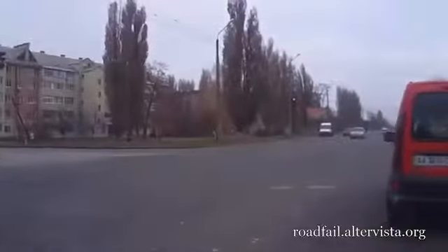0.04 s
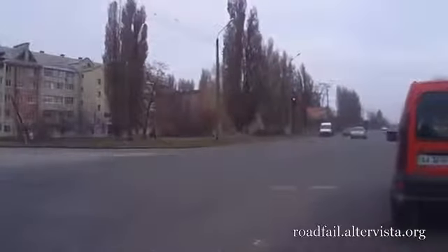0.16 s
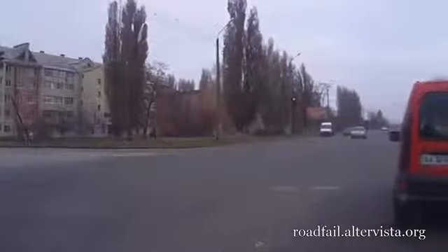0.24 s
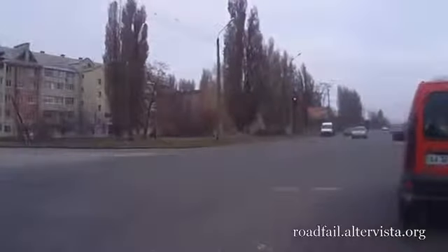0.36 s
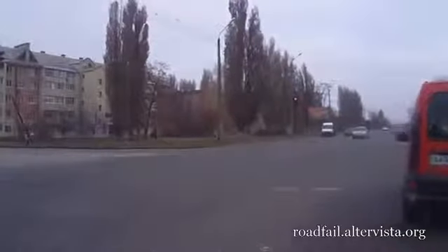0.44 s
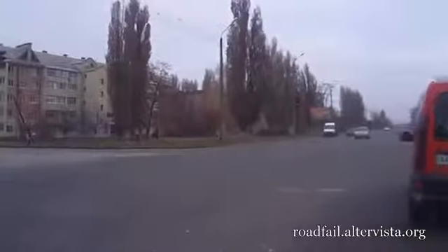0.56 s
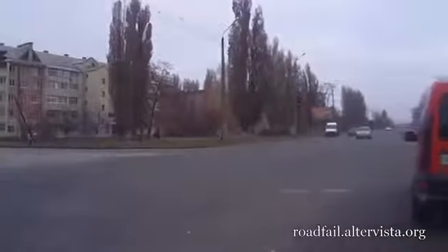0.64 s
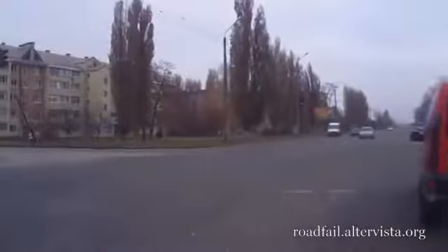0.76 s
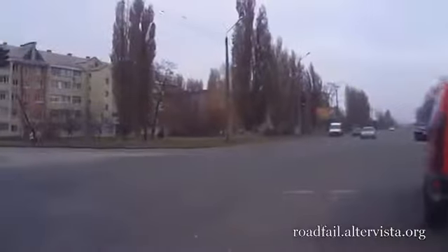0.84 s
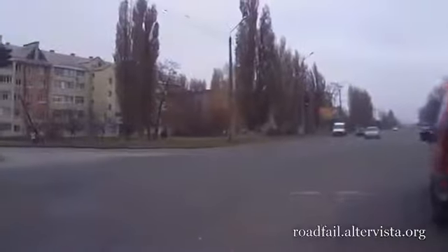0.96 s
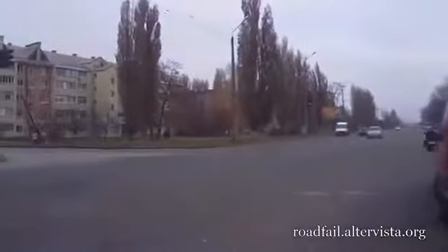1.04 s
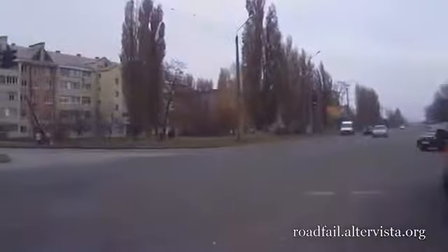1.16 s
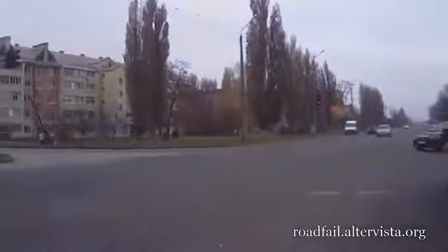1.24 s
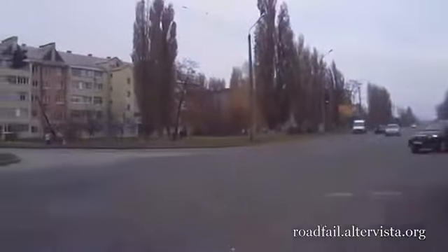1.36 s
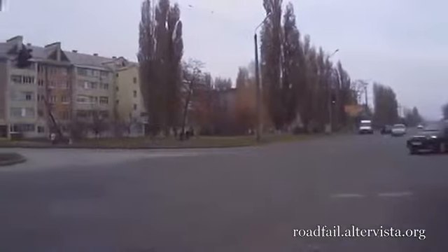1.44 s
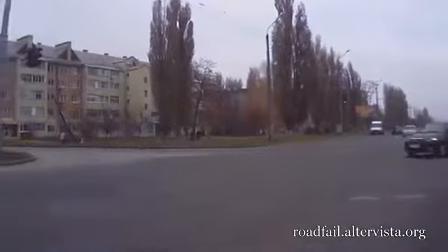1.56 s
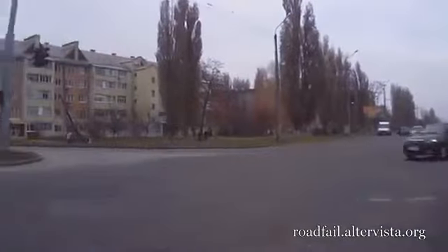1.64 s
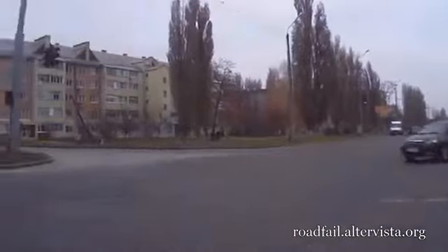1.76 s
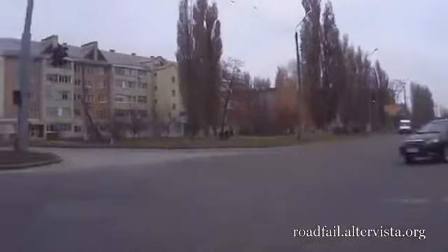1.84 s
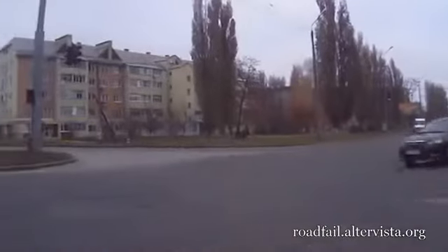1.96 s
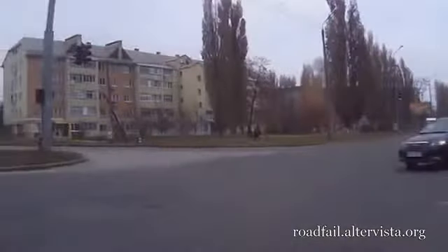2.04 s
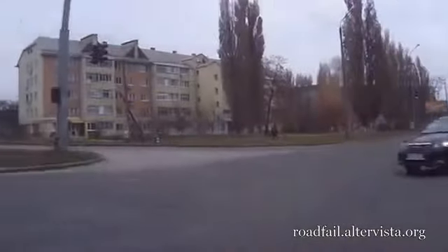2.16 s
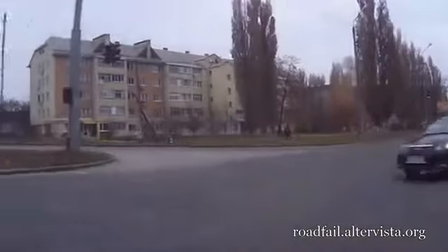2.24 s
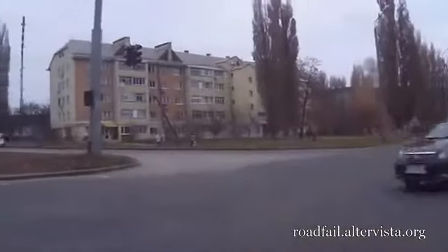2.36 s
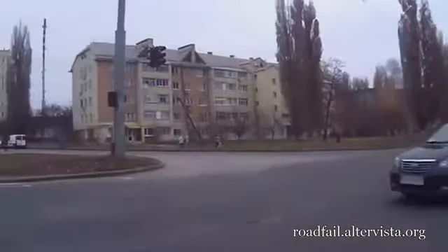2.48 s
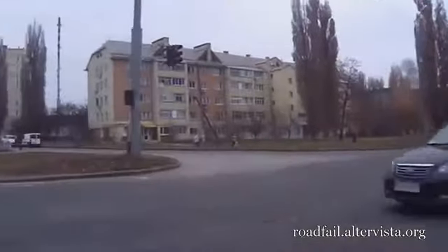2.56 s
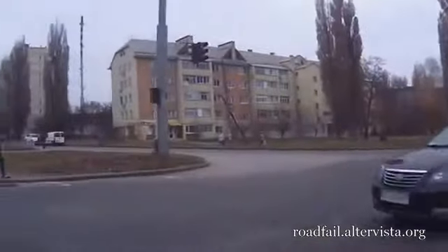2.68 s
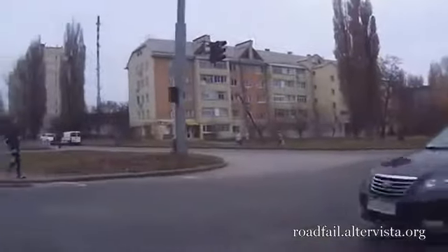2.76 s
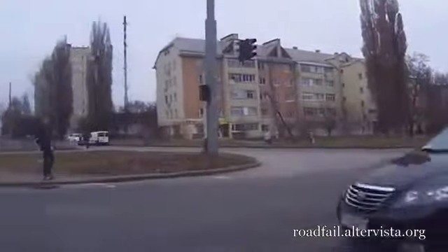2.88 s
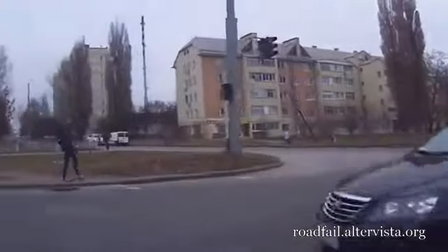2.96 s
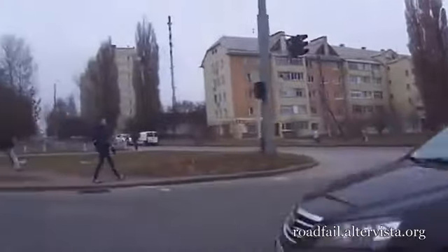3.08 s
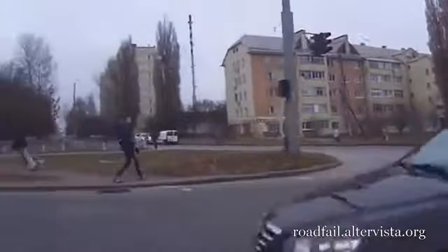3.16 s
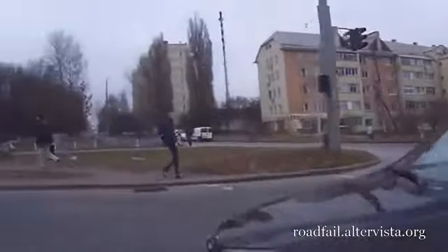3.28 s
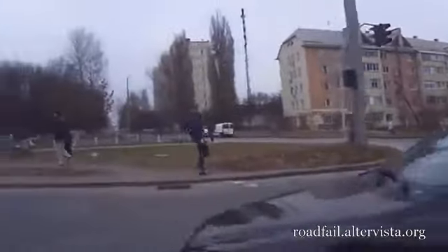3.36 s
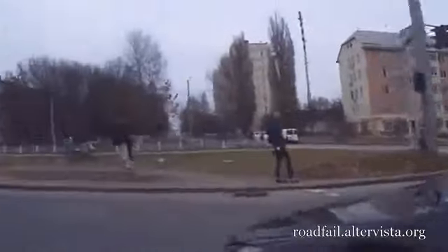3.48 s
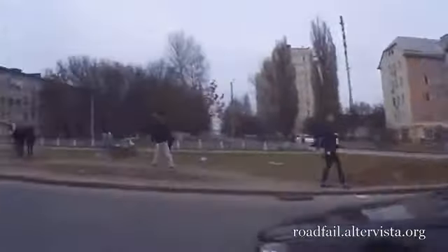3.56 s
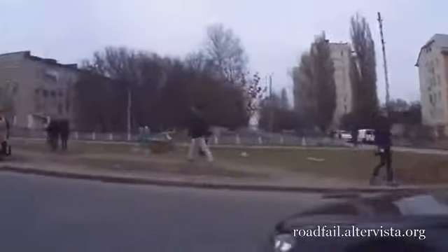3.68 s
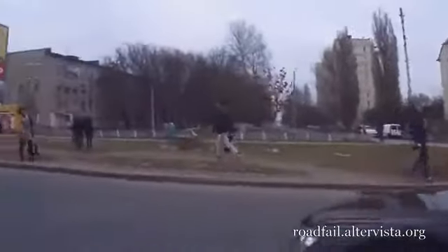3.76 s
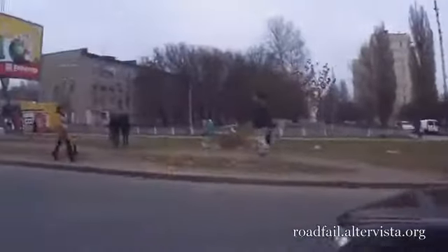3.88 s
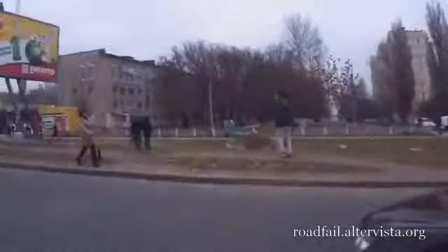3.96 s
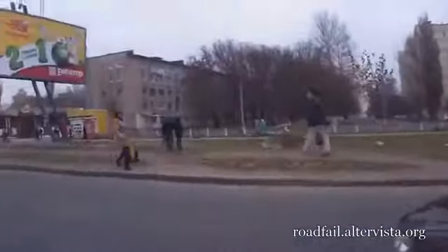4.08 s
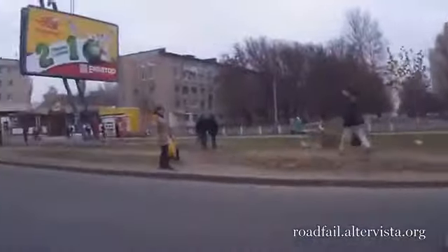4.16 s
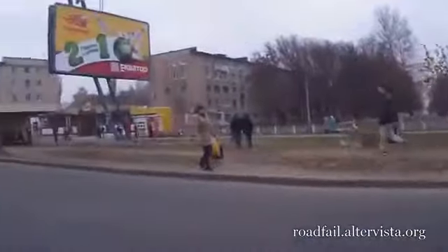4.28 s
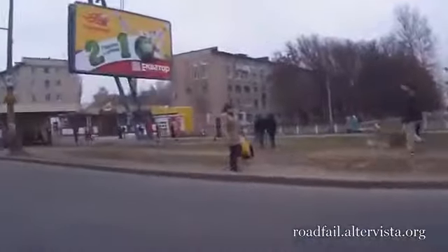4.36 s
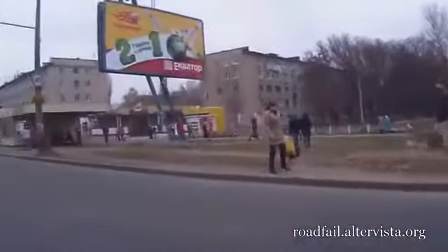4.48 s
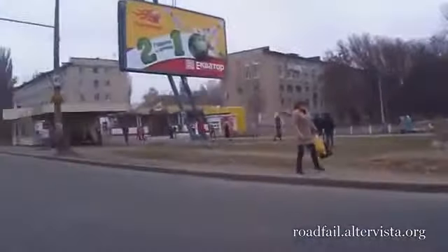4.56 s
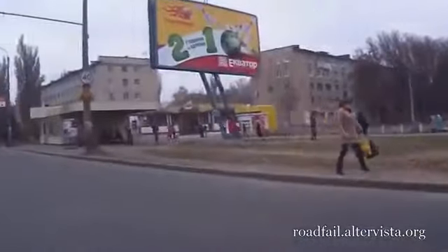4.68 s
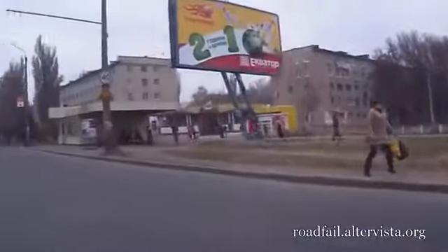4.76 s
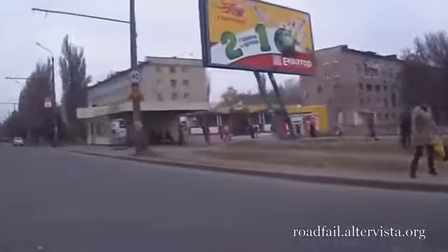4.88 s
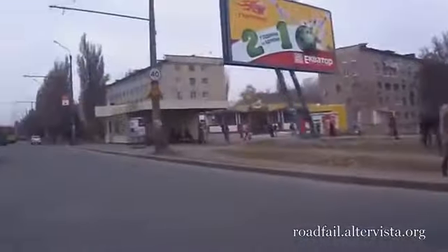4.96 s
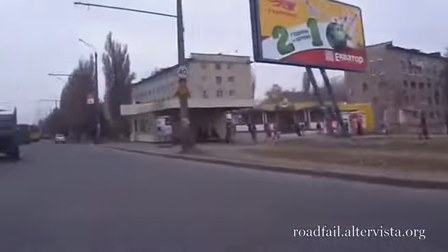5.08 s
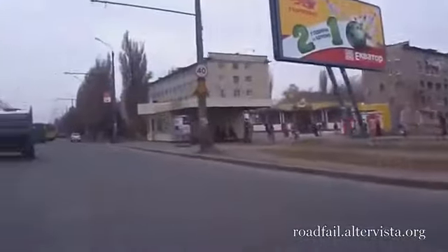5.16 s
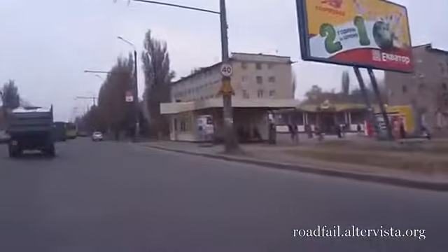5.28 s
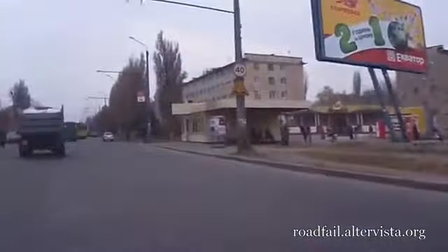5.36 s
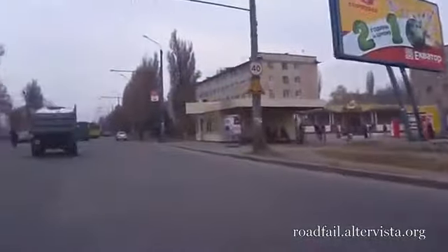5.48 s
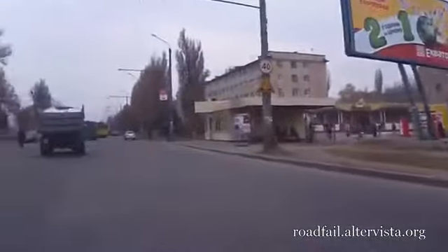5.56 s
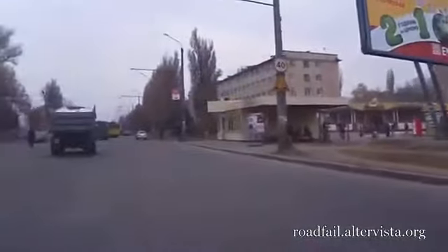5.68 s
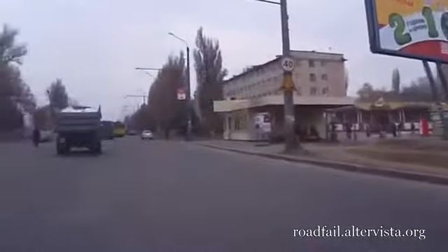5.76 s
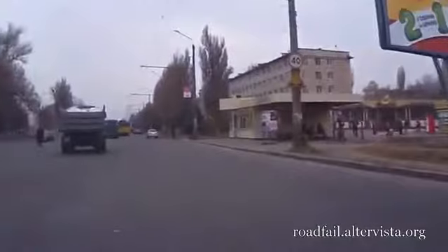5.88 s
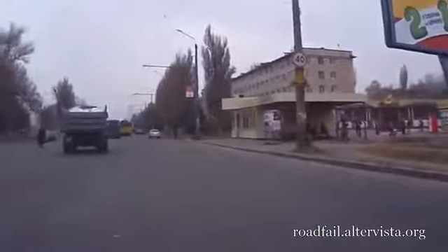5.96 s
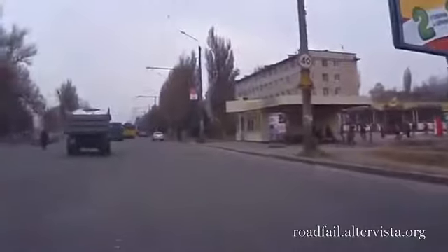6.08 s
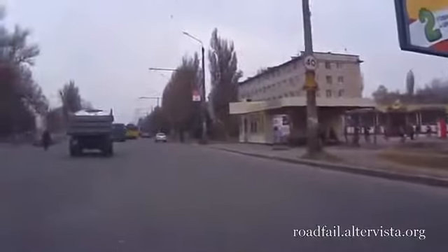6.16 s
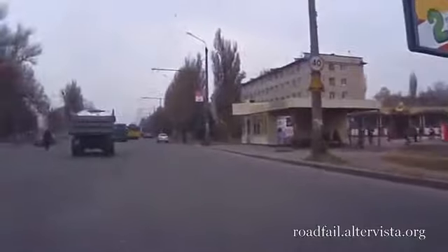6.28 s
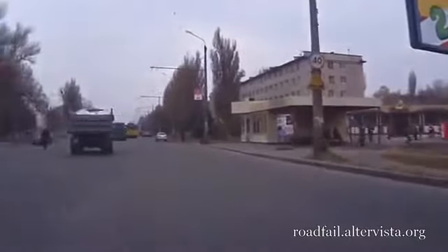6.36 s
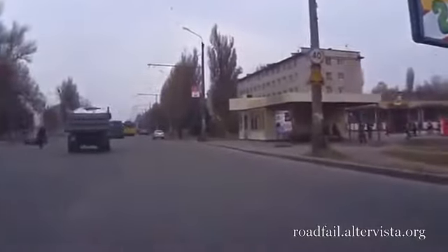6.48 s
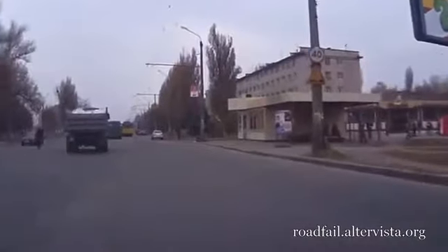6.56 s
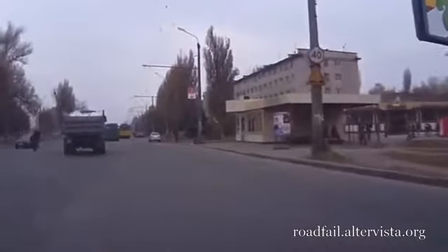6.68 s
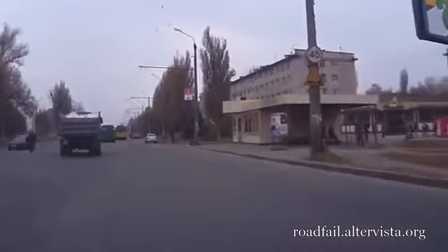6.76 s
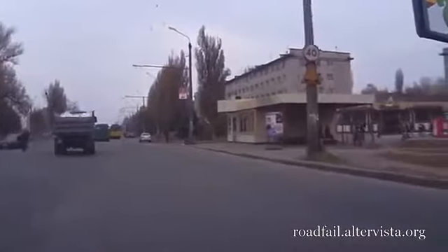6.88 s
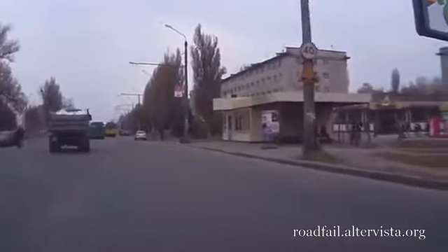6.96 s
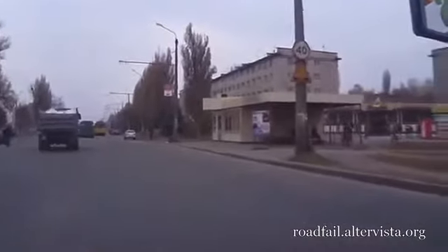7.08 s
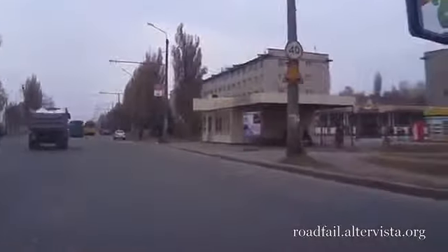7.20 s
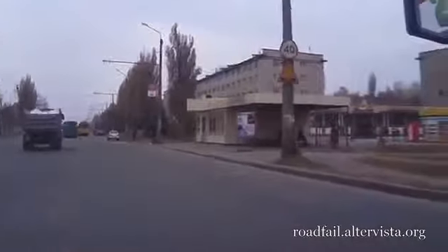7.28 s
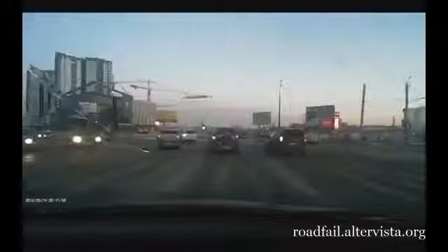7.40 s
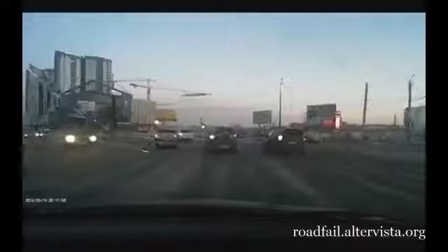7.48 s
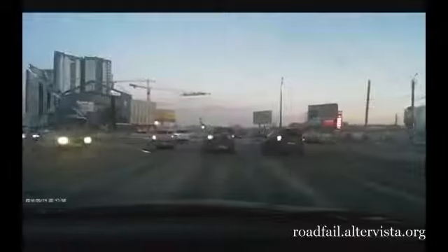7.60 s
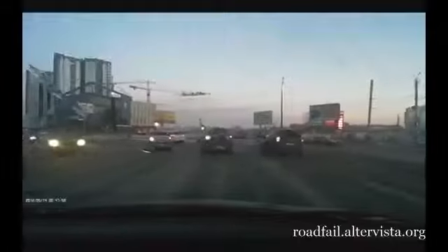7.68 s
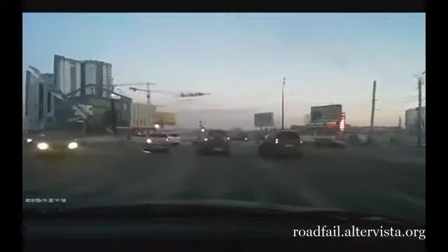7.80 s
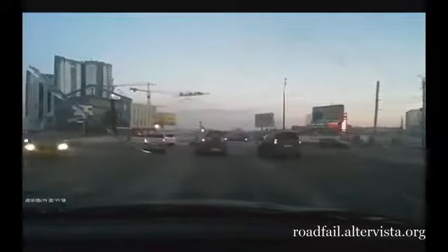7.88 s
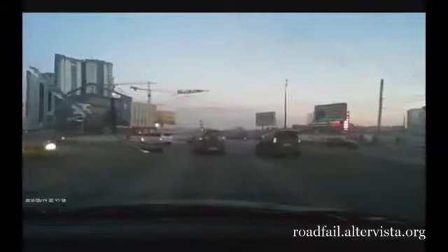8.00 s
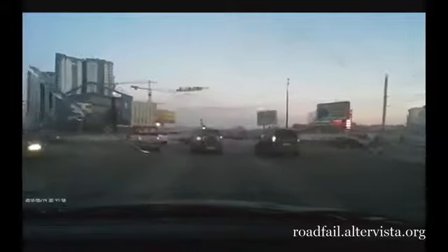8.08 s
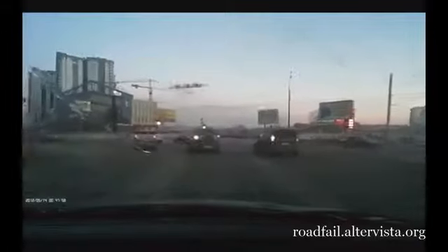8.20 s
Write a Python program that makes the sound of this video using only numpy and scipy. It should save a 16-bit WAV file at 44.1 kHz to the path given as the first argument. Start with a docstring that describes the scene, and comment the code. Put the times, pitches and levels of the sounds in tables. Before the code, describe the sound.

From inside a small car, a dashboard microphone picks up low engine hum, suspension rumble, tyre roar and faint hiss. From 0 to 0.9 seconds the engine sinks, then pulls and rises to a peak near 2.6 before easing. Hard plastic ticks, dull taps, soft rustles and tiny trim squeaks punctuate the drive. At about 3.4 a collision bursts in: deep body booms, crumpling sheet metal, dense plastic snaps and thin glass slivers, with another hard pair of cracks near 3.9. The loud blows distort and choke the microphone. The engine flares briefly around 4.05, then falls. From roughly 4 to 6.5 a bent panel rubs a tyre with hollow roaring, wavering groans, gritty scraping and tread drumming, plus a faint squeal near 4.5. A short thump lands at 4.65. Rubbing fades as the car slows, leaving low engine throb and quiet road noise. A soft knock sounds at 7.3, then an abrupt cut at 7.43.

```python
"""Car crash heard from inside

Inside a small car turning across a junction, the engine revs and eases and hard parts tick on the dashboard.
Another car hits it: shaped noise booms, random fractures ring the panels, and short bursts make plastic snap.
The loud blows overload the dashboard microphone. A bent panel then rubs on a tyre, as wandering narrow bands
and a comb of tread tones, while car and engine slow. A late soft knock follows and the sound cuts off."""
import sys
import numpy as np
from scipy import signal
from scipy.fft import rfft, irfft, next_fast_len
from scipy.io import wavfile
from scipy.ndimage import map_coordinates

SR = 44100
rng = np.random.default_rng(int(sys.argv[2]) if len(sys.argv) > 2 else 0)


def int16_out(signal):
    """Quantize to a 16-bit WAV file."""
    q = np.round(np.clip(np.atleast_2d(signal).T, -1, 1) * 32767)
    wavfile.write(sys.argv[1], SR, q.astype(np.int16))


N = 363163

# Soft rustles in the cabin: (time [s], hold [s], level [dB])
RUSTLE_EVENTS = [(0.128, 0.42, -54), (0.713, 0.067, -47.5), (1.077, 0.041, -53.5), (1.259, 0.098, -49.5),
                 (1.526, 0.079, -49.5), (2.103, 0.21, -56.5), (4.227, 0.13, -50.5), (5.179, 0.063, -46),
                 (5.389, 0.076, -50.5), (6.095, 0.81, -58.5)]
RUSTLE_ATTACK_S, RUSTLE_RELEASE_S, RUSTLE_BODY_DB = 0.094, 0.89, -8.5
HISS_DB = -59  # steady, whatever the speed

# Road speed: (time [s], tread blocks passing per second [Hz])
TREAD_RATE = [(0, 108), (.9, 98), (1.6, 117.3), (2.4, 188), (3.3, 172.9), (4.4, 159.3), (4.95, 159.1),
              (6.2, 87.99), (6.6, 76), (7.4, 68.25)]
CRUISE_HZ = 150  # tread rate at which the three road levels below hold
RUMBLE_DB, RUMBLE_DB_PER_OCTAVE = -33, 5
ROAR_DB, ROAR_DB_PER_OCTAVE = -46.5, 6
RUSH_DB, RUSH_DB_PER_OCTAVE = -55.5, 8.5
WHIR_DB = -63

# Engine speed: (time [s], firing rate [Hz])
FIRING_RATE = [(0, 71.9), (.35, 61.75), (.59, 50.3), (.9, 40.18), (1.05, 43.06), (1.25, 49.52),
               (1.45, 55.38), (1.77, 65.93), (2.18, 85.54), (2.4, 94.9), (2.57, 99.3), (2.77, 94),
               (3.08, 82.1), (3.45, 62), (4.05, 117), (4.4, 97.95), (4.88, 72.47), (5.3, 57), (6, 34.19),
               (6.4, 29.81)]
# Engine load, lifting every tone except the firing note: (time [s], lift [dB])
ENGINE_LOAD = [(0, -8), (.88, -8), (1.02, 12.5), (1.15, 12.5), (1.3, 4.5), (1.7, 3.5), (2.1, -1),
               (2.6, -2.5), (3.4, -2.5), (4.7, -1), (5.6, 14), (6.7, 12)]
# Firing note alone: (time [s], lift [dB])
FIRING_NOTE = [(0, 0.5), (.3, 4), (1.65, 1.5), (1.85, -3), (2.25, 3), (3.05, 2.5), (3.25, -6.5), (4.1, -7),
               (4.6, -0.5), (5.3, 0.5), (6, -0.5)]
# Engine tones: (multiple of the firing rate, relative level [dB])
ENGINE_ORDERS = [(.5, -10.5), (1, -0.3), (1.5, -17.5), (2, -12), (2.5, -24.5), (3, -17), (3.5, -21.5),
                 (4, -30), (5, -35), (6, -40.5), (8, -37)]
# How the body passes engine vibration: (frequency [Hz], gain [dB])
BODY_RESPONSE = [(100, -1.5), (135, 5), (160, -6), (190, -10.5), (235, -7.5), (295, 1.5), (350, 3),
                 (500, 7)]
HUNT_HZ = .5  # unsteadiness of the firing rate
# The cabin booms when the firing rate passes its lowest resonance
CABIN_BOOM_HZ, CABIN_BOOM_WIDTH_HZ, CABIN_BOOM_DB = 61.5, 4.37, 9
ENGINE_DB, ENGINE_DB_PER_OCTAVE = -36.5, 8  # level at that rate without the boom; growth with engine speed

# Cabin and windscreen resonances: (frequency [Hz], width [Hz], lift [dB])
CABIN_RESONANCES = [(248, 410, 1.5), (340, 13, 3.5), (391.5, 3.4, 7.5), (573, 6.5, 6.5), (599, 4, 8.5),
                    (673, 9.1, 11), (890, 8.3, 2.5), (996, 6.2, 9), (1630, 190, 2.5), (1840, 49, 3)]

# Hard ticks on the dashboard: (time [s], level before ringing [dB], 60 dB decay [s], ring [Hz])
TICK_EVENTS = [(0.454, -26, 0.036, 2600), (0.882, -45, .02, 10000), (1.4217, -26.5, 0.036, 9000),
               (2.2533, -23.5, 0.034, 8000), (2.589, -36, .008, 12000), (2.8595, -31, .009, 3700),
               (3.1325, -27, 0.008, 2000), (5.31, -33, 0.01, 8500), (6.375, -46, .02, 6300),
               (6.53, -48, .02, 9000)]
TICK_RING_DB, TICK_RING_Q = 5.5, 7
# Loose things tapping in the cabin: (time [s], level [dB])
TAP_EVENTS = [(.271, -45), (.455, -41), (.513, -46), (.693, -44), (1.123, -41), (1.424, -40), (1.556, -40),
              (2.129, -47), (3.133, -41), (4.338, -32), (4.892, -34)]
# Dull knocks through the body: (time [s], level [dB], pitch [Hz], 60 dB decay [s])
KNOCK_EVENTS = [(3.352, -13.5, 30.54, 0.22), (3.882, -5, 110.3, 0.11), (3.937, -5, 80, 0.14),
                (4.65, 0.5, 62.5, 0.028), (5.701, -16, 111, 0.11), (7.2988, -18.5, 256.4, 0.06),
                (7.301, -35.5, 588, 0.045)]
# Short squeaks of the trim: (centre [s], length [s], pitch [Hz], level [dB], whole bend [share of pitch])
SQUEAK_EVENTS = [(0.832, 0.058, 590, -43.5, -0.056), (1.047, 0.025, 545, -46, -.05),
                 (1.418, 0.045, 1439, -50, -.06), (1.455, .05, 1490, -53, .1),
                 (5.675, 0.012, 2420, -44.5, .02)]
SQUEAL_S, SQUEAL_HOLD_S, SQUEAL_HZ, SQUEAL_DB = 4.32, .41, 2715, -54.5

# Panel pressing harder on the tyre:
# (time [s], attack [s], hold [s], release [s], pressure [dB], extra grit [dB], groan pitch [Hz])
PRESSES = [(4.046, 0.76, 0.21, 2.2, -1, 1.5, 560), (4.384, 1, 0.17, 3.1, 0.5, 0.5, 633),
           (4.721, 0.84, 0.32, 1, -1.5, 1, 557), (5.119, 0.97, 0.16, 1.2, 0, -1, 660),
           (5.729, 0.28, 0.033, 0.57, -1, 5.5, 680), (5.823, 0.23, 0.029, 0.16, -5.5, 7, 720),
           (5.957, .3, .04, 0.48, -18, -7.5, 695), (6.182, 0.67, 0.019, 0.37, -1, 2.5, 680)]
# The panel stays against the tyre, dragging lightly between presses
DRAG_S, DRAG_HOLD_S, DRAG_DB, DRAG_HZ = 4.12, 1.89, -10, 602.5
# Tread drumming on the panel: (time [s], level [dB])
DRUM_LEVEL = [(3.9, -71), (4.1, -36), (4.45, -37), (5, -32.5), (5.2, -37), (5.42, -27.5), (5.56, -33.5),
              (5.72, -30.5), (5.87, -30), (5.97, -38), (6.15, -31.5), (6.3, -44), (6.6, -58), (6.8, -80)]
ARCH_DB, GROAN_DB, GRIT_DB = -27, -34.5, -42.5  # base levels at a pressure of 0 dB
GROAN_GROWTH, GRIT_GROWTH = 1.74, 1.6  # dB per dB of pressure
GROAN_RING_DB, GROAN_WIDTH_HZ, GROAN_WANDER = -5, 28, .035  # the panel's bending resonance
JUDDER_DB, JUDDER_PER_S = .4, 45  # the contact grabs and lets go
GROAN_CHATTER_DB, TREAD_DEPTH = .8, .4

# Slivers of glass: (time [s], hold [s], level [dB], ring [Hz])
SLIVER_EVENTS = [(3.511, .01, -28, 12020), (3.592, .015, -39, 12600), (3.657, .012, -33.5, 12200),
                 (4.074, .016, -37, 11700)]
GLASS_ATTACK_S, GLASS_RELEASE_S, GLASS_WIDTH_HZ = .03, .1, 1200

# Blows of the collision: (time [s], hold [s], body boom [dB], boom release [s], crumpling [dB])
BLOW_EVENTS = [(3.438, 0.015, -22.5, 0.28, -24), (3.454, 0.025, -8, 0.28, -15.5),
               (3.529, 0.036, -11, 0.76, -24.5), (3.647, 0.089, -20.5, 0.72, -28.5),
               (3.775, 0.0071, -19, 0.74, -26.5), (3.883, 0.016, -11, 0.21, -21),
               (3.946, 0.02, -13.5, 0.45, -24.5)]
BOOM_ATTACK_S = 0.14
CRUMPLE_ATTACK_S, CRUMPLE_RELEASE_S = .03, .22
DEBRIS_DB, DEBRIS_RELEASE_S = -7.5, 0.95  # loose pieces settle after each blow
# Sheet metal buckling: (time [s], level [dB], 60 dB decay [s], panel ring [Hz])
BUCKLE_EVENTS = [(3.433, -30, 0.13, 903), (3.449, -18, 0.069, 1280), (3.468, -12.5, 0.042, 1100),
                 (3.488, -17.5, 0.027, 695), (3.496, -16, 0.1, 1520), (3.531, -24, 0.15, 800),
                 (3.582, -26.5, 0.046, 1574), (3.594, -21, 0.053, 900), (3.622, -32.5, 0.061, 1000),
                 (3.655, -30, 0.082, 745), (3.684, -35.5, 0.045, 1186), (3.773, -21, 0.11, 1600),
                 (3.783, -17.5, 0.16, 748), (3.903, -20.5, 0.1, 653.6), (3.971, -26.5, 0.11, 805)]
PANEL_RING_DB, PANEL_RING_Q, CREASE_TOP_HZ = 10, 14, 3500
# Loudest snaps of plastic: (time [s], level before SNAP_DB and ringing [dB], 60 dB decay [s], shard ring [Hz])
SNAP_EVENTS = [(3.457, -9, .016, 2400), (3.471, -1, .007, 2000), (3.4765, -11, .01, 1600),
               (3.4875, -1, .008, 1700), (3.496, -10, .007, 2100), (3.503, -8, .008, 2900),
               (3.508, -11, .016, 2700), (3.514, -10, .014, 3400), (3.521, -9, .01, 2400),
               (3.531, -16, .012, 2200), (3.549, -16, .012, 3000), (3.558, -7, .018, 2700),
               (3.581, -19, .016, 1800), (3.601, -13, .007, 2400), (3.607, -19, .01, 1300),
               (3.632, -20, .01, 2600), (3.644, -23, .012, 3200), (3.684, -18, .02, 2800),
               (3.7675, -25, .012, 6500), (3.891, -19, .012, 3000), (3.9124, 13, .005, 2650),
               (3.9182, 10, .007, 2850), (3.927, -8, .014, 2500), (3.937, 4, .009, 3100),
               (3.957, -15, .02, 3300), (3.9795, 5, .007, 2900), (4.066, -33, .05, 3600),
               (4.331, -26, .14, 3500)]
SNAP_DB = -1.5  # shifts all snaps
SHARD_RING_DB, SHARD_RING_Q = 8, 14
# Fragments thrown off while the panels crumple
SPLINTERS_PER_S, SPLINTER_T60_S, SPLINTER_RANGE_DB = 2000, .004, 22
SPLINTER_LOW_HZ, SPLINTER_HIGH_HZ = 2800, 15000
SPLINTER_DB = -13  # relative to the crumpling panels
# The caving body squeezes the cabin air hard enough to choke the microphone: (centre [s], length [s])
PRESSURE_SURGES = [(3.465, .008), (3.4925, .006), (3.5265, .008), (3.572, .013), (3.615, .015),
                   (3.65, .007), (3.695, .009), (3.9525, .013)]
SURGE_DB = -6

# Tone colours of the noises, cracks and scrapes: (frequency [Hz], relative level [dB])
RUMBLE_COLOUR = [(12, -15.5), (22, -3), (30, -4), (42, -10.5), (62, -4), (90, -18.5), (150, -23),
                 (200, -37.5), (400, -81.5)]
ROAR_COLOUR = [(90, -11.5), (150, -0.5), (190, 1.5), (260, 5.5), (400, -3.5), (510, -3), (600, -4),
               (680, -5), (760, -7), (1100, -22), (2500, -33)]
RUSH_COLOUR = [(400, -35.5), (900, 3.5), (1300, 7), (1750, 5.5), (2100, 1.5), (2800, -2), (3600, -6.5),
               (5000, -11.5), (9000, -21)]
WHIR_COLOUR = [(450, -36), (590, 3), (660, -1), (730, -7.5), (860, -29), (2000, -61.5)]
FIZZ_COLOUR = [(1200, -10), (2400, 3), (3500, -5.5), (5000, -6), (7000, 0), (9500, 0), (15000, -3.5)]
BOOM_COLOUR = [(12, -21), (28, 6), (70, 1), (110, -1.5), (150, -1), (190, -12.5), (245, -6), (340, -15.5),
               (500, -29.5), (1200, -62)]
CRUMPLE_COLOUR = [(100, -12.5), (250, 8.5), (450, 4), (680, -0.5), (1000, -7), (1600, -6.5), (2100, -8.5),
                  (2700, -10), (4000, -20), (5200, -23.5), (9000, -21), (15000, -17)]
PLASTIC_COLOUR = [(400, -15), (1500, -2.5), (2700, -1.5), (4000, -0.5), (5200, 2.5), (8000, -2.5),
                  (15000, 0)]
TICK_COLOUR = [(300, -37), (900, -16), (1600, -2), (2300, 3), (3200, 0.5), (5500, -3), (8000, 3.5),
               (10000, 1.5), (15000, -5)]
TAP_COLOUR = [(300, -10), (700, 11.5), (1200, 11.5), (2300, 1.5), (3200, 5), (5000, -43), (15000, -3)]
ARCH_COLOUR = [(60, -15), (110, 3), (155, 4.5), (195, -7), (250, 2), (315, -5), (360, -3), (430, -8),
               (500, -13.5), (800, -34), (3000, -78)]
GROAN_COLOUR = [(350, -28), (470, 0), (560, 5), (670, 0), (760, 1.5), (880, -1), (980, -17.5),
                (1300, -20.5), (3000, -57.5)]
GRIT_COLOUR = [(400, -9.5), (800, -9), (1100, 8), (1300, -4), (1520, 4), (1700, -3), (1890, 0), (2100, -5),
               (2450, -2.5), (2730, -5.5), (3100, -9), (4500, -20), (9000, -19)]

# Microphone response: (frequency [Hz], gain [dB])
MICROPHONE_RESPONSE = [(2850, -1), (3300, -7.5), (3900, -11.5), (5000, -17.5), (7000, -13.5), (8000, -16),
                       (9500, -10.5), (12000, -20.5), (15000, -25.5)]
# Share of the sharp treble that still gets through the choked microphone
LEAK_DB, LEAK_HZ = -21, 2200
CUT_S, TOP_HZ = 7.43, 15400  # where the sound cuts off; top of the treble


def amp(db):
    """Turn decibels into a gain."""
    return 10 ** (np.asarray(db) / 20)


def unit(x):
    """Scale to an average (rms) strength of 1."""
    return x / np.sqrt(np.mean(x ** 2) + 1e-20)


def curves(rows):
    """Draw straight lines between table rows: one value per sample for each column after the time."""
    s, *cols = np.transpose(rows)
    return [np.interp(np.arange(N) / SR, s, c) for c in cols]


def wobble(rate):
    """A smooth random curve through `rate` random points a second."""
    points = rng.standard_normal(int(N * rate / SR) + 4)
    return map_coordinates(points, [np.arange(N) * rate / SR])


def cycles(hz):
    """Running phase, in radians, of a changing pitch."""
    return 2 * np.pi * np.cumsum(hz) / SR


def envelope(s, attack, hold, release):
    """Gain that rises 60 dB over the attack, holds from time s, and falls 60 dB over the release."""
    t = np.arange(N) / SR - s
    distance = np.maximum(-t / attack, (t - hold) / release)
    return amp(-60 * np.clip(distance, 0, 3))


def together(gains):
    """Independent sounds add in power."""
    return np.sqrt(sum(g ** 2 for g in gains))


def add(track, s, sound):
    """Mix a sound in at time s."""
    part = track[round(s * SR):][:len(sound)]
    part += sound[:len(part)]


def colour(x, points):
    """Filter through (frequency, gain) points without any sound ahead of its cause."""
    size = 2 * next_fast_len(len(x) // 2 + 4096)
    hz, db = np.transpose(points)
    gain = amp(np.interp(np.log(np.fft.rfftfreq(size, 1 / SR) + 1), np.log(hz), db))
    # folding the cepstrum gives the minimum-phase filter
    cepstrum = irfft(np.log(gain))
    cepstrum[1:size // 2] *= 2
    cepstrum[size // 2 + 1:] = 0
    return irfft(rfft(x, size) * np.exp(rfft(cepstrum)))[:len(x)]


def ring(x, hz, q, db):
    """Lift one resonance of the sounding part."""
    return x + (amp(db) - 1) * signal.lfilter(*signal.iirpeak(hz, q, fs=SR), x)


def cabin(x):
    """Standing waves in the cabin lift a few bands."""
    for hz, width, db in CABIN_RESONANCES:
        x = ring(x, hz, hz / width, db)
    return x


def noise(points):
    """Coloured noise in the cabin, rms 1."""
    return unit(cabin(colour(rng.standard_normal(N), points)))


def crackle(points, rate, spread_db):
    """Tiny random fractures of unequal size, coloured and heard in the cabin, rms 1."""
    sizes = rng.choice([-1, 1], N) * amp(spread_db * np.clip(rng.standard_normal(N), -2, 2))
    fractures = sizes * (rng.random(N) < rate / SR)
    return unit(cabin(colour(fractures, points)))


def burst(points, t60, cabin_db, cabin_t60):
    """A sharp crack followed by the cabin's short answer."""
    t = np.arange(SR // 4) / SR
    fade = amp(-60 * t / t60) + amp(cabin_db - 60 * t / cabin_t60)
    return unit(colour(rng.standard_normal(len(t)), points)) * fade


def tone(hz, waver):
    """A sine of rms 1 whose pitch wavers as the contact sticks and slips."""
    return np.sqrt(2) * np.sin(cycles(hz * (1 + waver * wobble(120))))


def rasp(hz, width_hz, wander):
    """A rubbed resonance of rms 1: a narrow, broken band whose centre wanders as the part bends."""
    phase = cycles(hz * (1 + wander * wobble(12)))
    return unit(wobble(width_hz) * np.sin(phase) + wobble(width_hz) * np.cos(phase))


def rustles():
    """Soft rustles swell out of a faint hiss, both made of flickering noise."""
    swell = together(amp(db) * envelope(s, RUSTLE_ATTACK_S, hold, RUSTLE_RELEASE_S)
                     for s, hold, db in RUSTLE_EVENTS)
    fizz = together([swell, amp(HISS_DB)]) * noise(FIZZ_COLOUR)
    body = amp(RUSTLE_BODY_DB) * swell * noise(RUSH_COLOUR)
    return amp(2.3 * wobble(60)) * (fizz + body)


def road():
    """Suspension rumble, tyre roar and rushing air grow with road speed, over a steady hollow whir."""
    octaves = np.log2(curves(TREAD_RATE)[0] / CRUISE_HZ)
    rumble_db = RUMBLE_DB + RUMBLE_DB_PER_OCTAVE * octaves + 1.2 * wobble(8)
    roar_db = ROAR_DB + ROAR_DB_PER_OCTAVE * octaves + 1.8 * wobble(15)
    rush_db = RUSH_DB + RUSH_DB_PER_OCTAVE * octaves + 1.6 * wobble(30)
    rumble = amp(rumble_db) * noise(RUMBLE_COLOUR)
    roar = amp(roar_db) * noise(ROAR_COLOUR)
    rush = amp(rush_db) * noise(RUSH_COLOUR)
    return rumble + roar + rush + amp(WHIR_DB) * noise(WHIR_COLOUR)


def engine():
    """Firing tones grow with engine speed, the firing note booms in the cabin, and load lifts the others."""
    hz, = curves(FIRING_RATE)
    load_db, = curves(ENGINE_LOAD)
    note_db, = curves(FIRING_NOTE)
    boom_db = note_db + CABIN_BOOM_DB / (1 + ((hz - CABIN_BOOM_HZ) / CABIN_BOOM_WIDTH_HZ) ** 2)
    phase = cycles(hz + HUNT_HZ * wobble(18))
    out = np.zeros(N)
    for order, order_db in ENGINE_ORDERS:
        # uneven combustion makes the other tones flutter more than the firing note
        if abs(order - 1) > 1 / 4:
            lift_db = load_db + 3 * wobble(16)
        else:
            lift_db = boom_db + 1.1 * wobble(12)
        out += amp(order_db + lift_db) * np.sin(order * phase + 2 * np.pi * rng.random())
    speed_db = ENGINE_DB + ENGINE_DB_PER_OCTAVE * np.log2(hz / CABIN_BOOM_HZ)
    return np.sqrt(2) * amp(speed_db) * colour(out, BODY_RESPONSE)


def ticks():
    """Hard plastic parts tick, each with its own ring, among duller taps and a faint rattle."""
    out = amp(-71.5) * crackle(TICK_COLOUR, rate=10.0, spread_db=0.5)
    for s, db, t60, hz in TICK_EVENTS:
        tick = burst(TICK_COLOUR, t60, cabin_db=-24.0, cabin_t60=0.17)
        add(out, s, amp(db) * ring(tick, hz, TICK_RING_Q, TICK_RING_DB))
    for s, db in TAP_EVENTS:
        add(out, s, amp(db) * burst(TAP_COLOUR, t60=0.062, cabin_db=-19, cabin_t60=0.3))
    return out


def knocks():
    """Dull blows, each one quickly damped resonance."""
    out, t = np.zeros(N), np.arange(SR // 3) / SR
    soft_start = 1 - np.exp(-t / 0.003)
    for s, db, hz, t60 in KNOCK_EVENTS:
        add(out, s, -amp(db - 60 * t / t60) * soft_start * np.sin(2 * np.pi * hz * t))
    return out


def squeaks():
    """Trim squeaks in short glides as the body flexes; the dragging panel squeals faintly."""
    squeal = envelope(SQUEAL_S, attack=0.25, hold=SQUEAL_HOLD_S, release=0.3)
    out = amp(SQUEAL_DB) * squeal * rasp(SQUEAL_HZ, width_hz=70, wander=.005)
    for s, length, hz, db, bend in SQUEAK_EVENTS:
        progress = np.clip((np.arange(N) / SR - s) / length, -.5, .5)
        swell = np.cos(np.pi * progress)  # silent outside the squeak
        out += amp(db) * swell * tone(hz * (1 + bend * progress), waver=0.0117)
    return out


def rubbing():
    """A bent panel drags on the tyre: tread blocks drum on it, and each press bends it to its own groan."""
    contact = amp(DRAG_DB) * envelope(DRAG_S, attack=0.3, hold=DRAG_HOLD_S, release=0.6)
    presses = [(amp(db) * envelope(s, attack, hold, release), grit_db, hz)
               for s, attack, hold, release, db, grit_db, hz in PRESSES]
    presses.append((contact, 0, DRAG_HZ))
    pressure = together(press for press, _, _ in presses)
    scrape = together(amp(grit_db) * press ** GRIT_GROWTH for press, grit_db, _ in presses)

    tread_hz, = curves(TREAD_RATE)
    phase = cycles(tread_hz * (1 + 0.045 * wobble(45)))
    drum = amp(curves(DRUM_LEVEL)[0]) * rasp(tread_hz, width_hz=28, wander=.035)
    # blocks of unequal length give a dense comb of tones that follows the wheel speed
    comb = sum(amp(4.07 * wobble(14)) * np.sin(k * phase / 2 + 2 * np.pi * rng.random())
               for k in range(2, 18))

    def drive(points):
        """Equal parts of noise and tread comb shake the panel."""
        return unit(noise(points) + unit(cabin(colour(comb, points))))

    def groan_at(hz):
        """The shaken panel with its bending resonance at hz."""
        resonance = amp(GROAN_RING_DB) * rasp(hz, GROAN_WIDTH_HZ, GROAN_WANDER)
        return unit(drive(GROAN_COLOUR) + resonance)

    roar = amp(ARCH_DB) * pressure * drive(ARCH_COLOUR)
    groans = sum(press ** GROAN_GROWTH * groan_at(hz) for press, _, hz in presses)
    groan = amp(GROAN_DB + GROAN_CHATTER_DB * wobble(70)) * groans
    grit = amp(GRIT_DB + .8 * wobble(60)) * scrape * crackle(GRIT_COLOUR, rate=5000, spread_db=3)
    judder = amp(JUDDER_DB * wobble(JUDDER_PER_S))
    blocks = 1 + TREAD_DEPTH * np.sin(phase)
    return drum + judder * roar + blocks * (judder * groan + grit)


def glass():
    """Slivers of lamp glass skitter with a thin, high ring."""
    return sum(amp(db) * envelope(s, GLASS_ATTACK_S, hold, GLASS_RELEASE_S)
               * rasp(hz, GLASS_WIDTH_HZ, wander=.004)
               for s, hold, db, hz in SLIVER_EVENTS)


def splinters():
    """Small fragments of plastic, each ringing briefly at its own pitch, rms 1."""
    out, t = np.zeros(N), np.arange(SR // 50) / SR
    for when, pitch, size in rng.random((round(SPLINTERS_PER_S * N / SR), 3)):
        hz = SPLINTER_LOW_HZ * (SPLINTER_HIGH_HZ / SPLINTER_LOW_HZ) ** pitch
        fade = amp(-SPLINTER_RANGE_DB * size - 60 * t / SPLINTER_T60_S)
        add(out, when * N / SR, fade * np.sin(2 * np.pi * hz * t))
    return unit(out)


def buckle(t60, hz):
    """A crease runs through a panel: a sharp crack, then a dying run of fractures that ring it."""
    t = np.arange(SR // 4) / SR
    fractures = rng.standard_normal(len(t)) * (rng.random(len(t)) < 1500 / SR)
    fractures[0] = 3  # the opening crack
    steady = ring(colour(fractures, CRUMPLE_COLOUR), hz, PANEL_RING_Q, PANEL_RING_DB)
    dulled = signal.lfilter(*signal.butter(1, CREASE_TOP_HZ, fs=SR), steady)
    return unit(dulled) * amp(-60 * t / t60)


def collision():
    """With each blow the body shell heaves; panels buckle one after another and plastic splinters and snaps."""
    boom = together(amp(db) * envelope(s, BOOM_ATTACK_S, hold, release)
                    for s, hold, db, release, _ in BLOW_EVENTS)
    crush = together(amp(db + tail_db) * envelope(s, CRUMPLE_ATTACK_S, hold, release)
                     for s, hold, _, _, db in BLOW_EVENTS
                     for tail_db, release in [(0, CRUMPLE_RELEASE_S), (DEBRIS_DB, DEBRIS_RELEASE_S)])
    panels = amp(1.2 * wobble(140)) * crackle(CRUMPLE_COLOUR, rate=2600, spread_db=4)
    out = boom * noise(BOOM_COLOUR) + crush * (panels + amp(SPLINTER_DB) * splinters())
    for s, length in PRESSURE_SURGES:
        add(out, s - length / 2, amp(SURGE_DB) * np.hanning(round(length * SR)))
    for s, db, t60, hz in BUCKLE_EVENTS:
        add(out, s, amp(db) * buckle(t60, hz))
    for s, db, t60, hz in SNAP_EVENTS:
        snap = burst(PLASTIC_COLOUR, t60, cabin_db=-36, cabin_t60=.1)
        add(out, s, amp(db + SNAP_DB) * ring(snap, hz, SHARD_RING_Q, SHARD_RING_DB))
    return out


def scene():
    """Everything as it reaches the windscreen."""
    background = rustles() + road() + engine()
    small_parts = ticks() + knocks() + squeaks()
    return (background + small_parts + rubbing() + glass() + collision())[None]


def overload(x, upper, lower, hardness):
    """Lopsided saturation: big swings flatten and half choke the crackle riding on them."""
    limit = np.where(x > 0, upper, lower)
    leak = amp(LEAK_DB) * signal.lfilter(*signal.butter(1, LEAK_HZ, "high", fs=SR), x)
    return x / (1 + np.abs(x / limit) ** hardness) ** (1 / hardness) + leak


def record(dry):
    """The microphone overloads, dulls the treble, blocks slow drift and stops abruptly."""
    x = overload(dry[0], upper=.2, lower=.35, hardness=3)
    x = colour(x, MICROPHONE_RESPONSE)
    x = signal.sosfilt(signal.butter(1, 8, "high", fs=SR, output="sos"), x)
    x = x * np.clip((CUT_S - np.arange(N) / SR) / .004, 0, 1)  # 4 ms fade to silence
    return signal.sosfilt(signal.ellip(10, .1, 90, TOP_HZ, fs=SR, output="sos"), x)[None]


dry = scene()
out = record(dry)
int16_out(out)
```